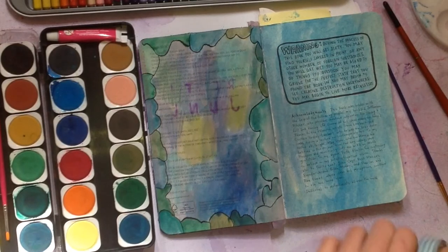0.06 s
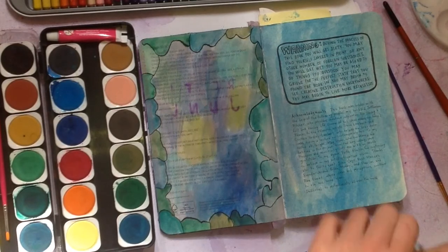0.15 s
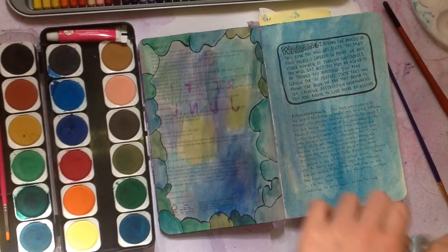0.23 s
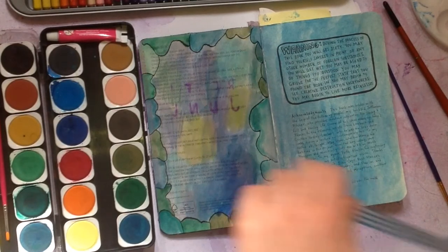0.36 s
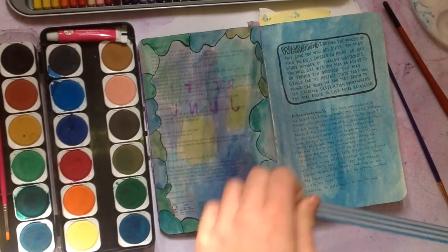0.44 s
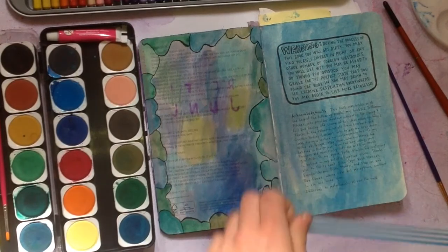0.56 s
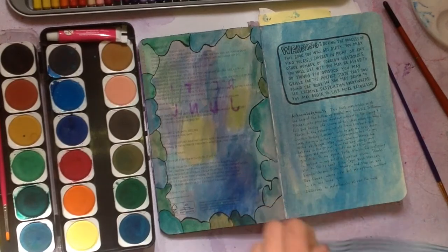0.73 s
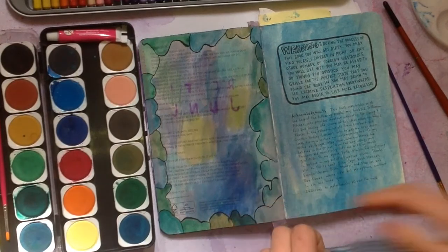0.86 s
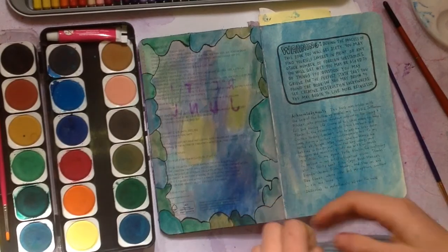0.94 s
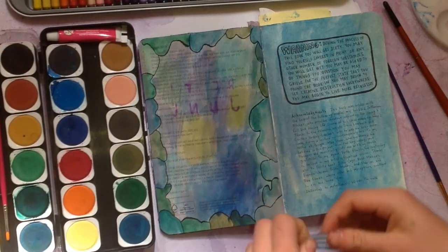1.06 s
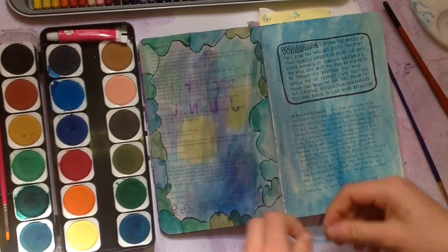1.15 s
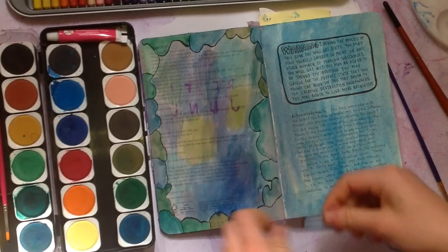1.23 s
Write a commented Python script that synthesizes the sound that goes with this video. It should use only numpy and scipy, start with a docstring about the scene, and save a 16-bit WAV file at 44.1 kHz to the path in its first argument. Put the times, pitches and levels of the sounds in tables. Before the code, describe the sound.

Sticky paper tape rips off in a rasping, brightening crackle, then light knocks on a desk.

```python
"""A strip of sticky paper tape on its roll, close to the microphone, in a small quiet room.
Fingers pick it loose with small tears and paper rustle, and one pull rips it off in a dense rasp of
snapping glue threads that brightens. Fingers and roll then tap and scuff the desk, whose modes thud;
a few last small crackles and low knocks follow. Room air, hiss and low rumble lie under it all."""
import sys
import numpy as np
from scipy import signal
from scipy.fft import rfft, irfft
from scipy.io import wavfile
from scipy.ndimage import uniform_filter1d

SR = 44100
rng = np.random.default_rng(int(sys.argv[2]) if len(sys.argv) > 2 else 0)


def magnitude_from_level(level_db):
    """Linear magnitude for a level in decibels (20 dB per decade)."""
    exponent = np.asarray(level_db, float) / 20
    return 10 ** exponent


def pcm_store(signal):
    """Save signal as 16-bit PCM."""
    levels = np.round(np.clip(np.atleast_2d(signal), -1, 1) * 32767)
    wavfile.write(sys.argv[1], SR, levels.astype(np.int16).T)


N = 57330  # length [samples]

# spectrum of slack tape: (frequency [Hz], relative level per Hz [dB])
SLACK = [(320, -39), (550, -19.5), (850, -23), (1030, -15), (1530, -22.5), (3560, -10.5), (3880, -9),
         (4850, -10), (5670, -6.5), (10400, -2.5), (11400, -2), (14700, -7), (15800, -7.5)]


def evened(x):
    """Scales a signal to an rms of 1."""
    return x / np.sqrt(np.mean(x ** 2) + 1e-20)


def read(points, hz):
    """Reads a (frequency, value) table along a logarithmic frequency axis."""
    f, value = np.transpose(points)
    return np.interp(np.log(hz + 1), np.log(f + 1), value)


def along(rows, col):
    """Draws one column of a timed table as a curve over the whole scene."""
    return np.interp(np.arange(N) / SR, [r[0] for r in rows], [r[col] for r in rows])


def add(mix, s, sound):
    """Adds a sound into the mix at s seconds."""
    part = mix[max(round(s * SR), 0):][:len(sound)]
    part += sound[:len(part)]


def colour(x, db_of_hz):
    """Filters by a curve of dB over frequency, then evens the rms to 1."""
    hz = np.fft.rfftfreq(len(x), 1 / SR)
    return evened(irfft(rfft(x) * magnitude_from_level(db_of_hz(hz)), len(x)))


def hump(f, hz, width):
    """A broad band-pass curve in dB, highest at hz."""
    return -20 * np.log10(1 + ((f - hz) / width * 2) ** 2)


def snaps(per_s, count=40):
    """Crackle of clumped little snaps, each ringing at one of count pitches, with its spectrum flattened."""
    spread_db, clump_db, clump_s = 3.1, 0.9, 0.004
    ring_s = 0.0009  # time constant
    loudness = magnitude_from_level(spread_db * np.minimum(rng.exponential(1, N), 3.5))
    size = loudness * (rng.random(N) < per_s / SR) * rng.choice([-1, 1], N)
    drift = uniform_filter1d(rng.standard_normal(N), max(round(clump_s * SR), 1))
    size = size * magnitude_from_level(clump_db * evened(drift))
    kind, t, out = rng.integers(0, count, N), np.arange(600) / SR, np.zeros(N)
    for k, hz in enumerate(np.linspace(200, 16200, count)):
        ring = np.exp(-t / ring_s) * np.cos(2 * np.pi * hz * t)
        out += signal.oaconvolve(size * (kind == k), ring)[:N]
    smooth = np.sqrt(uniform_filter1d(abs(rfft(out)) ** 2, size=1500))
    return evened(irfft(rfft(out) / smooth, N))


def bands(f, taut=0):
    """Boost in dB from the tape's own resonances, which differ between slack and taut tape."""
    # (centre [Hz], width [Hz], boost while slack [dB], boost while taut [dB])
    resonances = [(2545, 530, 3.5, 9), (3293, 88, 4.5, 11), (3885, 330, 7.5, 0), (5090, 140, 6.5, -5),
                  (6250, 530, 2, 8), (8100, 400, 4, 2.5), (9400, 820, 0, 4.5), (11700, 280, 4, 3),
                  (13000, 690, 3.5, 3)]
    return sum(row[2 + taut] / (1 + ((f - row[0]) / row[1] * 2) ** 2) for row in resonances)


def peel():
    """The long rip: snapping glue threads ring the tape and brighten as the pull speeds up."""
    # the pull: (time [s], level [dB], share of the bright taut colour [0-1])
    pull = [(.2065, -31.5, 0), (.225, -30.5, 0), (.24, -30, 0), (.27, -28, .2), (.31, -23, 0.13),
            (.342, -25.5, 0.66), (.37, -23, 0.56), (.398, -20.5, 0.9), (.42, -22, 0.98), (.446, -18.5, 1),
            (.456, -29, .9), (.463, -29, 1), (.478, -45, 1), (.5, -65, 0.8)]
    # spectrum of taut tape: (frequency [Hz], relative level per Hz [dB])
    taut_tape = [(88, -82.5), (150, -44.5), (1090, -23), (1380, -23), (1520, -19.5), (2680, -23.5),
                 (3200, -15.5), (6320, -13), (6970, -9), (9340, -2), (14900, -9), (15800, -12.5)]
    x, t = snaps(22000), np.arange(N) / SR
    late = np.clip(along(pull, 2), 0, 1)
    slack_sound = colour(x, lambda f: read(SLACK, f) + bands(f))
    taut_sound = colour(x, lambda f: read(taut_tape, f) + bands(f, 1))
    rip = (1 - late) * slack_sound + late * taut_sound
    return rip * magnitude_from_level(along(pull, 1)) * (t >= pull[0][0]) * (t < pull[-1][0])


def tears_and_knocks():
    """Short bursts of crackle, each with one decaying tone (low in the knocks), over a faint paper rustle."""
    # short tears of glue, and at 1.13 and 1.19 s low ringing knocks: (time [s], level [dB],
    # rise time constant [s], burst t60 [s], tilt [dB per octave, less steep in the bass],
    # ring [Hz], ring level against the burst [dB])
    bursts = [(.002, -37.5, 0.00026, 0.035, 2, 3760, -20), (0.0247, -36, 0.0002, 0.0219, 2.5, 2753, -4),
              (.058, -42.5, 0.0019, 0.043, 5, 5770, -17), (.068, -34.5, 0.0015, 0.019, -2.3, 2676, -5),
              (.0695, -46.5, 0.0012, 0.022, -8.2, 5180, 3.5),
              (0.0919, -31.5, 0.00066, 0.019, 0.2, 3870, -28),
              (.2065, -28.5, 0.00033, 0.047, 2, 4957, -4.5),
              (.219, -30.5, 0.00095, 0.0207, -1.5, 5850, 4.5), (0.226, -30, .0005, 0.021, 6.5, 11700, 6.5),
              (.252, -28.5, 0.00075, 0.0315, -3, 11990, 5), (0.279, -32.5, .001, 0.059, -2, 10960, -4),
              (.333, -23, 0.00068, 0.025, .1, 8100, -9), (0.416, -24, .0005, 0.014, 2, 8580, 9),
              (0.4215, -19, 0.00034, .015, 2, 8300, 7), (0.442, -24, 0.00044, 0.0095, 4, 8940, 6),
              (0.4583, -30, 0.00086, 0.022, -3.5, 8700, 10), (.72, -47.5, 0.00105, 0.022, -4.5, 7260, -7.5),
              (1.131, -46, .0004, 0.013, -4, 10050, 0.5), (1.1908, -42.5, 0.0018, 0.0092, -3, 4030, -6.5),
              (1.1306, -54, 0.00026, 0.0096, 1.5, 1080, 10), (1.1896, -48.5, 0.00052, 0.018, -9, 1610, 8.5),
              (1.191, -52, 0.0011, 0.016, -7.5, 1070, 13)]
    # paper rustle under the fingers: (time [s], level [dB])
    rustle = [(0, -64.5), (.04, -52), (.065, -57), (.11, -57.5), (.16, -62), (.2, -63.5), (.56, -64.5),
              (.625, -60), (.645, -61.5), (.7, -60.5), (.74, -71), (.8, -63.5), (.9, -64.5), (.97, -68),
              (1.09, -66.5), (1.11, -66.5), (1.2, -67.5), (1.3, -70)]
    ring_speed = 1.37  # the ring rises and dies this much faster than the burst
    x, t = snaps(14000), np.arange(N) / SR
    # the same snaps played backwards make the rustle
    out = magnitude_from_level(along(rustle, 1)) * colour(x[::-1], lambda f: read(SLACK, f) - 4.0 * np.log2(f / 8000 + 0.034))
    for s, db, rise, t60, tilt_db, hz, ring_db in bursts:
        swell = np.exp(np.minimum(t - s, 0) / rise)
        fall = magnitude_from_level(-60 * np.maximum(t - s, 0) / t60)
        shape = np.where(t < s, swell, fall)
        wide = colour(x, lambda f: read(SLACK, f) + bands(f) + tilt_db * np.log2(f / 8000 + 0.042))
        ring = shape ** ring_speed * np.sin(2 * np.pi * hz * (t - s))
        out += magnitude_from_level(db) * (shape * wide + magnitude_from_level(ring_db) * ring)
    return out


def modes(rows, t):
    """Sum of decaying sines, from rows of (frequency [Hz], level [dB], t60 [s])."""
    return sum(magnitude_from_level(db - 60 * t / t60) * np.sin(2 * np.pi * hz * t) for hz, db, t60 in rows)


def taps():
    """Each tap rings the modes of the tape roll and the desk, with a short noisy crack on top."""
    # taps: (time [s], level [dB], pitch factor of the roll, crack [dB], desk thud [dB])
    tap_list = [(.138, -46.5, 1.05, -16, -29), (0.531, -41.5, 1.13, -6, -12),
                (.652, -38.5, 1.17, -2.5, -10), (.683, -29.5, 0.94, -5, -5), (.6845, -47, 1.2, -19.5, -23),
                (0.713, -52.5, 1.54, 3, 0), (.788, -34.5, 0.906, -9, -46), (0.799, -48, 1.2, -16, -30),
                (0.8302, -39.5, 1.05, -17, -41), (.853, -48.5, 1.07, -18, -10),
                (.876, -52, 1.25, -11.5, -21), (.884, -50.5, 0.95, -7.5, -6), (.916, -55, 1.11, -14, 0),
                (0.919, -56, 1.05, -13, -12)]
    # modes of the tape roll: (frequency at pitch factor 1 [Hz], level [dB], t60 [s])
    roll_modes = [(1050, -4, 0.033), (1520, -33, 0.0048), (1853, 4, 0.0162), (2020, -11, 0.024),
                  (2476, 5, .014), (2840, -4.5, 0.004), (4470, -7.5, 0.0145), (4940, -22, .008)]
    # modes of the desk: (frequency [Hz], level [dB], t60 [s])
    desk_modes = [(182, 3.5, 0.068), (235, -4, 0.06), (336, -8, 0.018), (576.7, -2, 0.026)]
    crack_low_hz, crack_top_hz, crack_t60_s = 900, 8700, 0.024
    scatter = 0.03  # random spread of each roll mode, as a share of its pitch
    thud_rise_s = 0.0047
    out, t = np.zeros(N), np.arange(5000) / SR
    noises = rng.standard_normal((len(tap_list), len(t)))
    for (s, db, pitch, crack_db, thud_db), z in zip(tap_list, noises):
        tuned = [(hz * pitch * (1 + scatter * e), d, t60) for (hz, d, t60), e in zip(roll_modes, z)]
        thud = modes(desk_modes, t) * np.minimum(t / thud_rise_s, 1)
        crack = colour(z, lambda f: -20 * np.log10(1 + (f / crack_top_hz) ** 2 + (crack_low_hz / (f + 1)) ** 2))
        crack = crack * magnitude_from_level(-60 * t / crack_t60_s)
        add(out, s, magnitude_from_level(db) * (-.4 * modes(tuned, t) + magnitude_from_level(crack_db) * crack + magnitude_from_level(thud_db) * thud))
    return out


def scuff():
    """Sparse dull grains while the roll scuffs and rocks on the desk."""
    # scuffing of the roll: (time [s], level [dB])
    scuff_level = [(.5, -79.5), (.535, -69), (.57, -87), (.645, -87), (.66, -66), (.68, -69), (.69, -51.5),
                   (.725, -76.5), (.75, -89.5), (.785, -87.5), (.8, -56), (.825, -67), (.855, -62.5),
                   (.885, -64), (.9, -76), (.92, -63.5), (.96, -88.5)]
    centre_hz, width_hz = 2100, 1950
    grains = colour(snaps(2800), lambda f: hump(f, centre_hz, width_hz))
    return magnitude_from_level(along(scuff_level, 1)) * grains


def room(x):
    """The small room: dense echoes of random sign, each band dying at its own speed."""
    # decay of the room: (frequency [Hz], t60 [s])
    room_decay = [(300, 0.33), (1500, 0.2), (4000, 0.22), (9000, 0.14), (15000, 0.14)]
    echo = np.zeros(SR // 2)
    at = np.arange(130, len(echo) - 12, 12)  # first echo after about 3 ms
    echo[at + rng.integers(0, 12, len(at))] = rng.choice([-1., 1.], len(at))
    hz, t, z = signal.stft(echo, SR, nperseg=128)
    tail = signal.istft(z * magnitude_from_level(-60 * t / read(room_decay, hz)[:, None]), SR, nperseg=128)[1]
    return signal.fftconvolve(x, tail / np.linalg.norm(tail))[:N]


def hums():
    """Low soft hums through the desk: sines that swell, waver in pitch and fade."""
    # hums: (start [s], length [s], level [dB], frequency [Hz], rms waver [Hz])
    hum_list = [(-.03, .09, -52, 226, 12), (.225, .065, -48, 335, 18), (.21, .055, -50, 450, 45),
                (.82, .12, -61, 293, 4), (.7, .11, -63, 172, 10)]
    out, t = np.zeros(N), np.arange(N) / SR
    noises = rng.standard_normal((len(hum_list), N))
    for (s, length, db, hz, waver_hz), z in zip(hum_list, noises):
        waver = waver_hz * evened(uniform_filter1d(z, size=300))
        turns = np.cumsum(hz + waver) / SR
        swell = np.sin(np.pi * np.clip((t - s) / length, 0, 1))
        out += magnitude_from_level(db) * swell * np.sin(2 * np.pi * turns)
    return out


def background():
    """Steady noise of room air and microphone hiss, and a band of low rumble that rises and falls."""
    # spectrum of air and hiss: (frequency [Hz], relative level per Hz [dB])
    air_spectrum = [(18, -59), (30, -45), (169, -6), (353, -7.5), (698, -12), (931, -7.5), (1490, -13.5),
                    (2040, -16), (3190, -17.5), (4860, -19.5), (13500, -21), (15800, -21.5)]
    # low rumble, rising and falling: (time [s], level [dB])
    rumble = [(0, -61.5), (.1, -63), (.2, -64.5), (.45, -49), (.56, -71.5), (.64, -62), (.72, -55.5),
              (.8, -108.5), (.92, -60), (.97, -72), (1.04, -73), (1.1, -62), (1.19, -67), (1.3, -63)]
    air_db, rumble_hz, rumble_width_hz = -62, 251, 337
    air, low = rng.standard_normal((2, N))
    air = colour(air, lambda f: read(air_spectrum, f))
    low = colour(low, lambda f: hump(f, rumble_hz, rumble_width_hz))
    return magnitude_from_level(air_db) * air + magnitude_from_level(along(rumble, 1)) * low


def scene():
    """Tape, knocks, taps and scuffs close by with their room echo, then the hums and the background."""
    tape_low_hz = 380  # the tape's sounds carry little bass below this
    room_db = -11
    thin = signal.butter(4, tape_low_hz, "high", fs=SR, output="sos")
    tape = signal.sosfilt(thin, peel() + tears_and_knocks())
    near = tape + taps() + scuff()
    return (near + magnitude_from_level(room_db) * room(near) + hums() + background())[None]


def roll_off(x):
    """The treble ends steeply here."""
    return signal.sosfilt(signal.butter(12, 16460, fs=SR, output="sos"), x)


def record(dry):
    """The microphone drops the deep bass, and a steep low-pass limits the treble."""
    low_cut_hz, edge_hz = 270, 15480
    x = signal.sosfilt(signal.butter(1, low_cut_hz, "high", fs=SR, output="sos"), dry)
    low_pass = signal.firwin(255, edge_hz, window=("kaiser", 7), fs=SR)
    x = signal.oaconvolve(x, low_pass[None], "same")
    return roll_off(x)


dry = scene()
out = record(dry)
pcm_store(out)
```